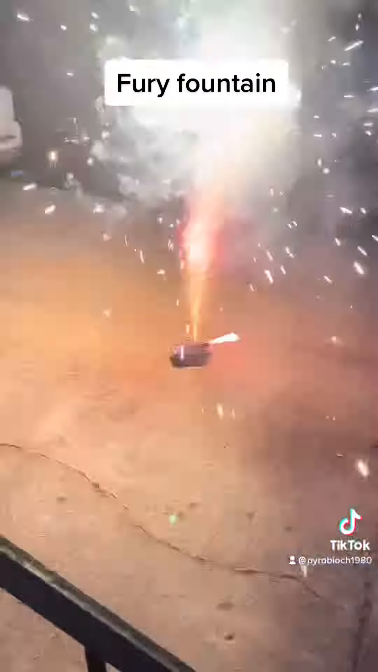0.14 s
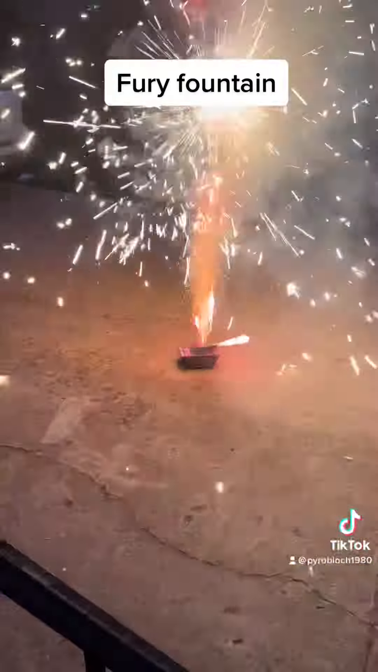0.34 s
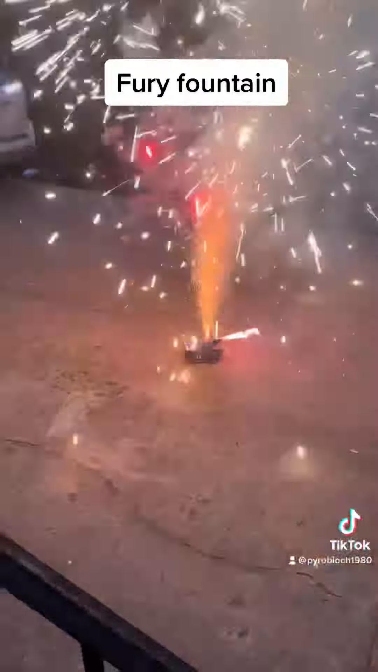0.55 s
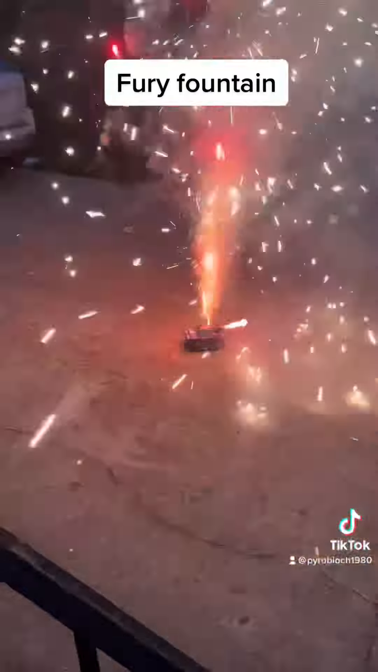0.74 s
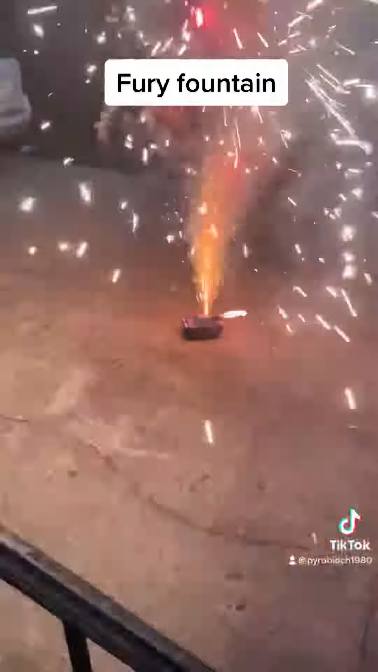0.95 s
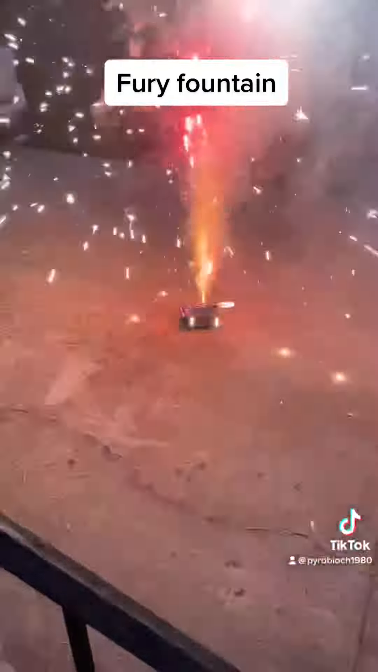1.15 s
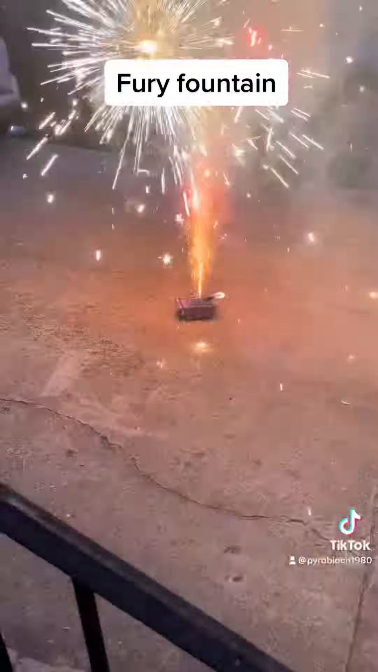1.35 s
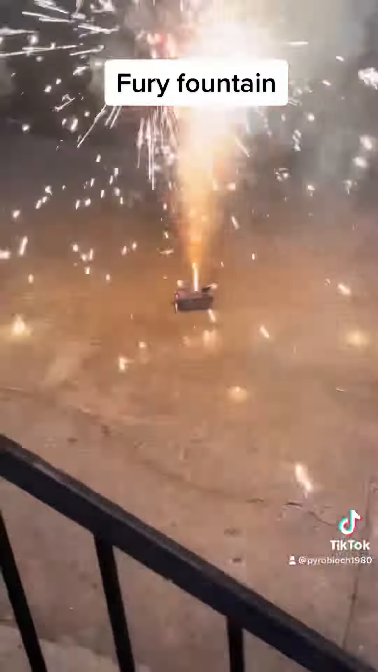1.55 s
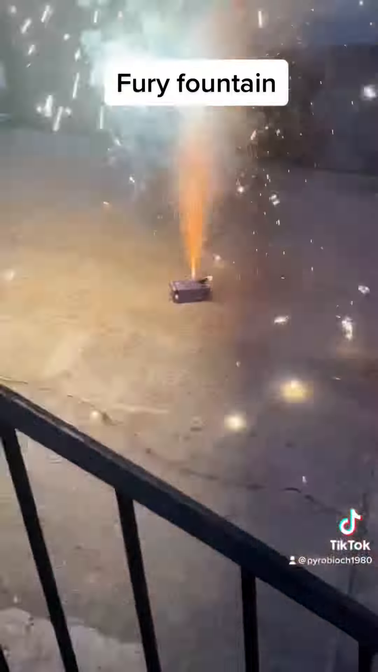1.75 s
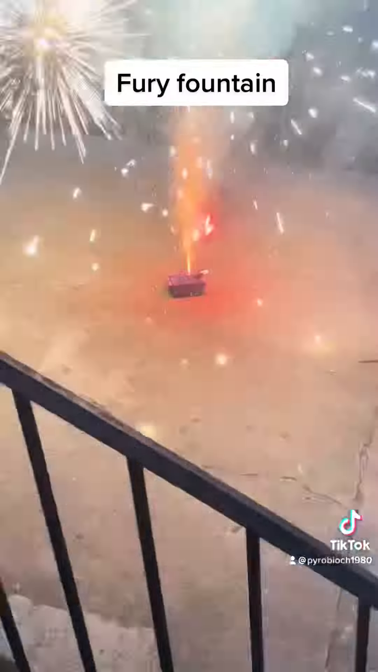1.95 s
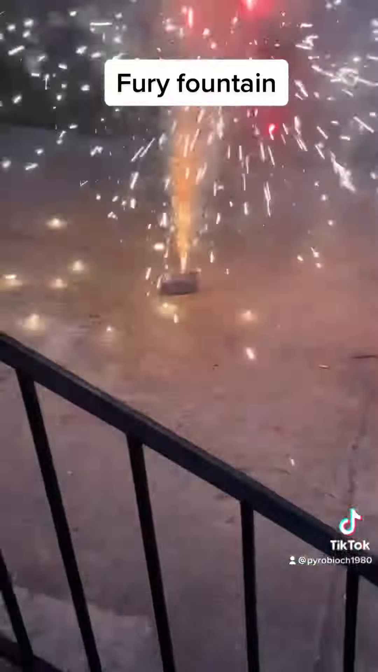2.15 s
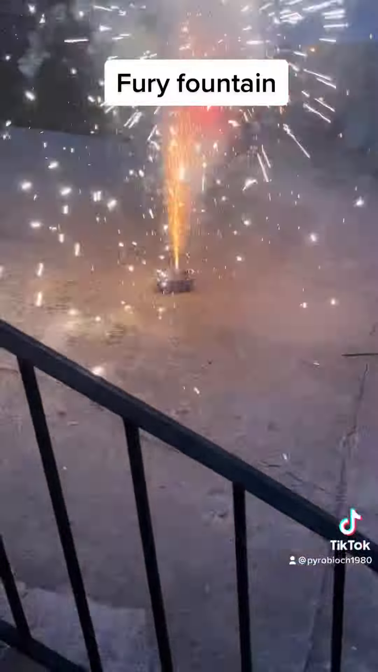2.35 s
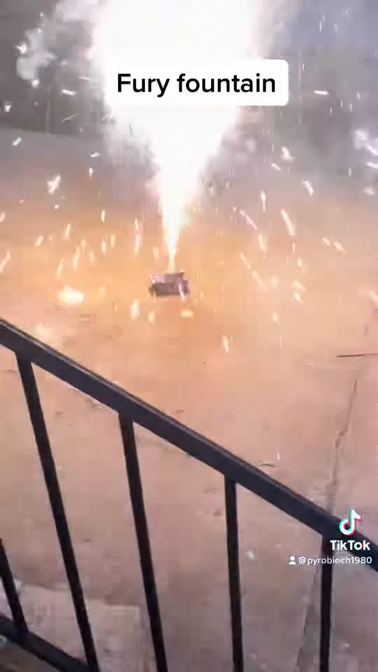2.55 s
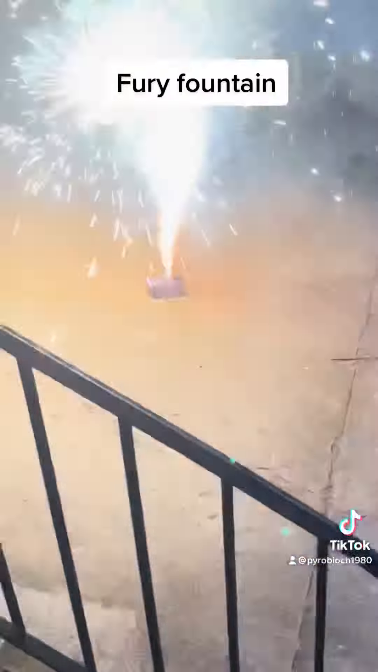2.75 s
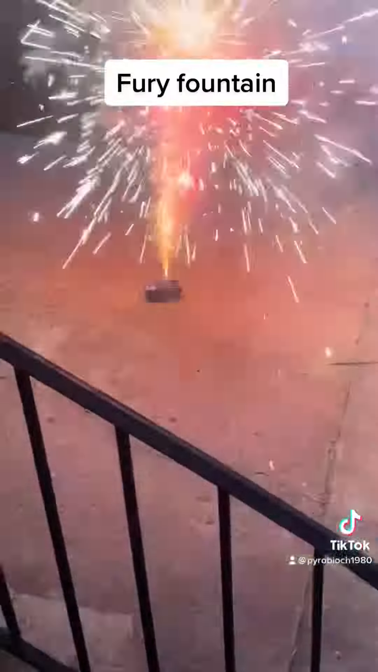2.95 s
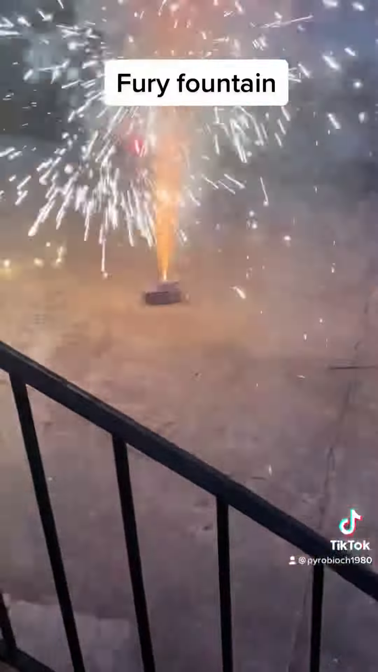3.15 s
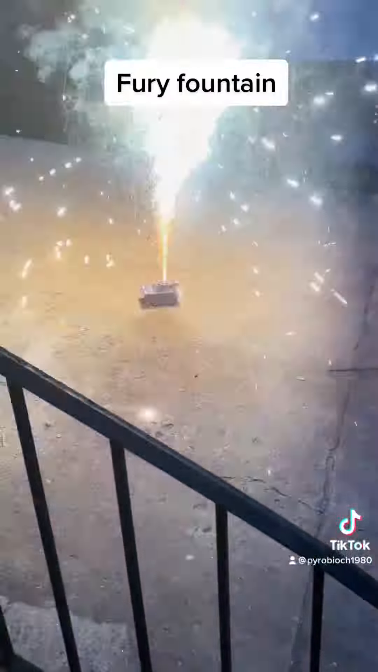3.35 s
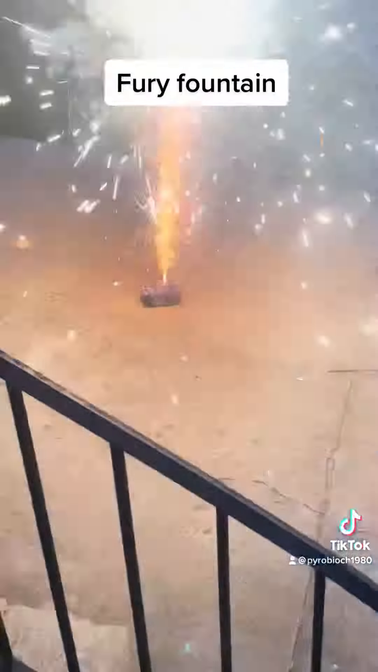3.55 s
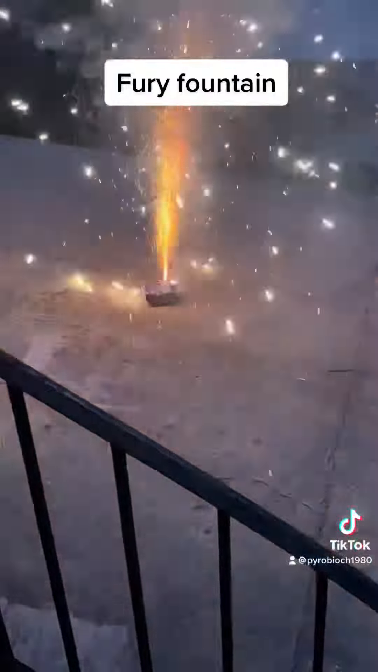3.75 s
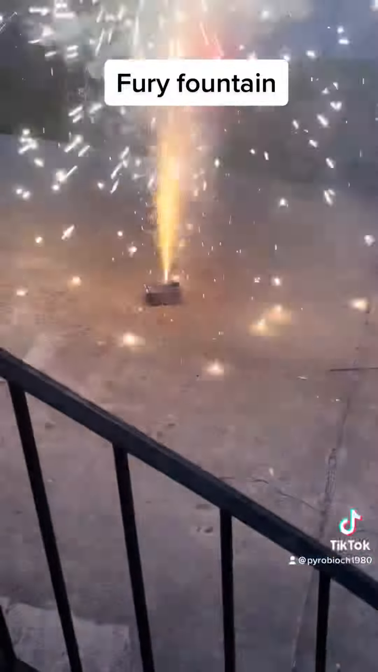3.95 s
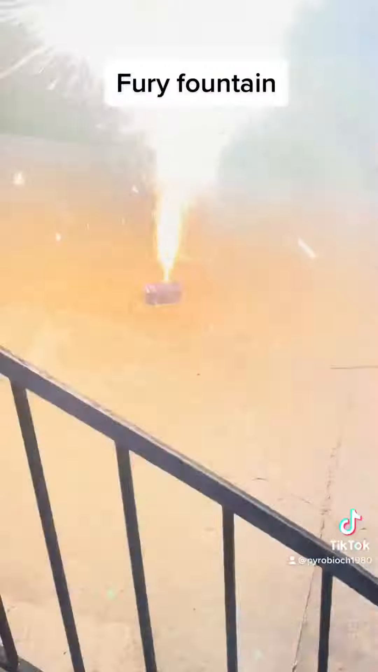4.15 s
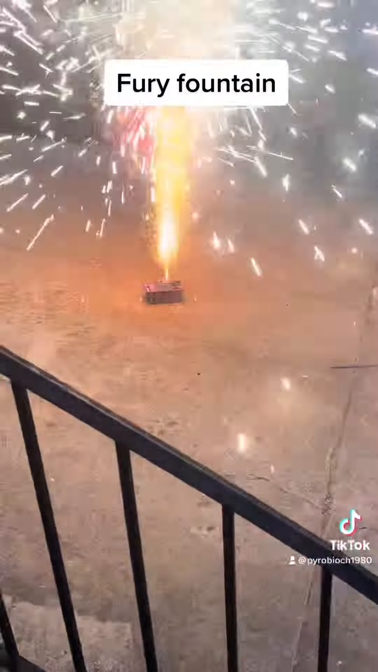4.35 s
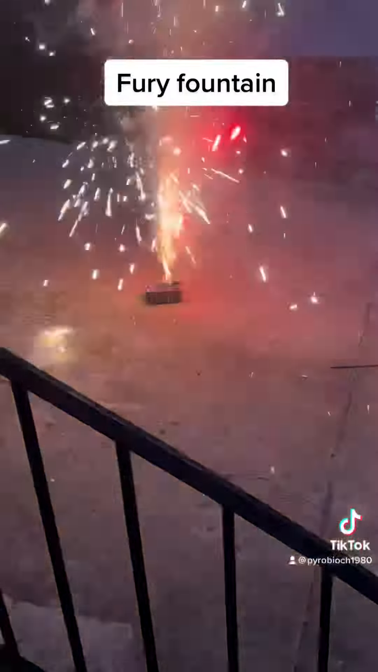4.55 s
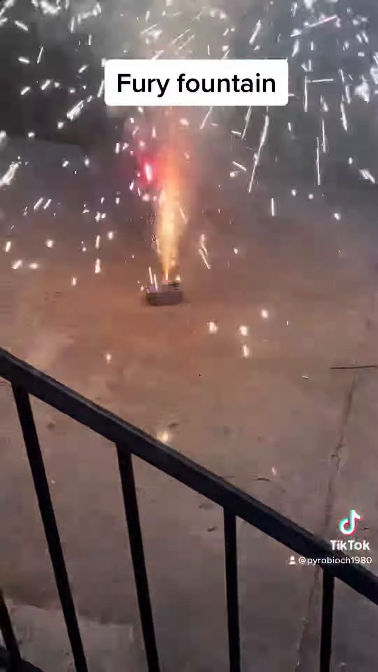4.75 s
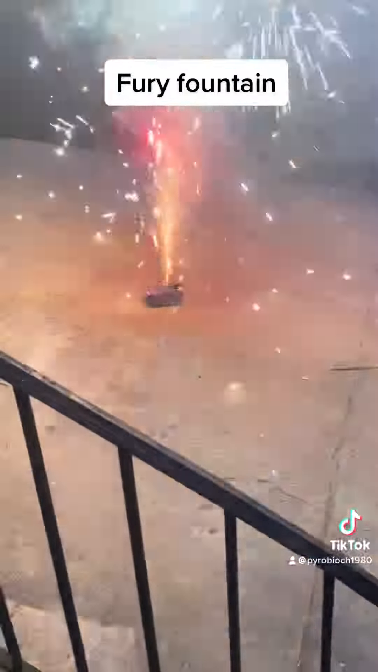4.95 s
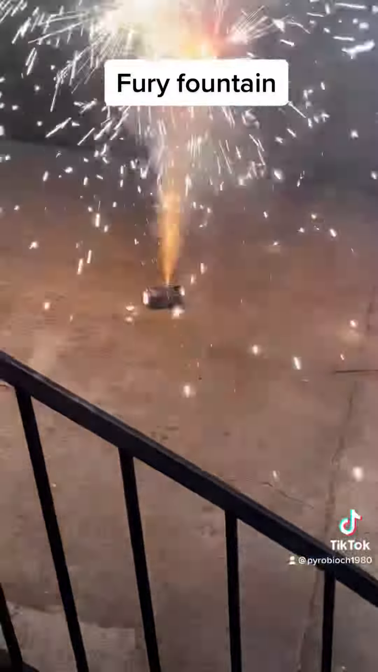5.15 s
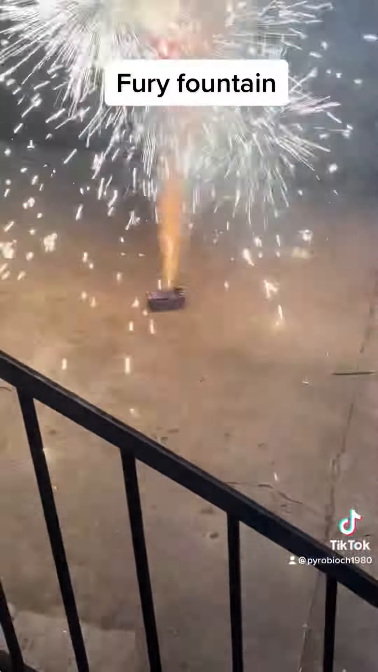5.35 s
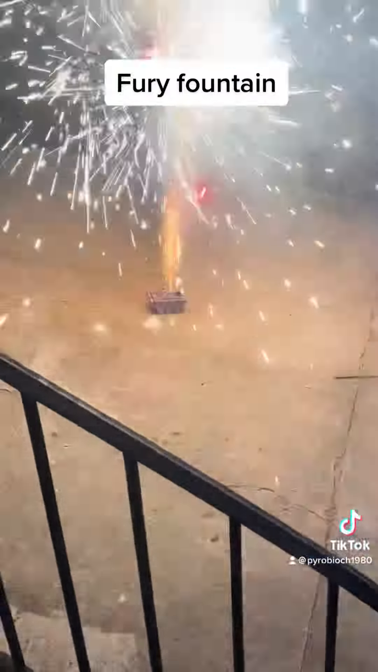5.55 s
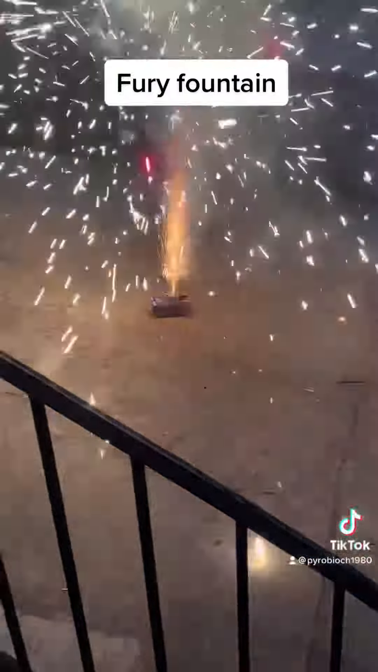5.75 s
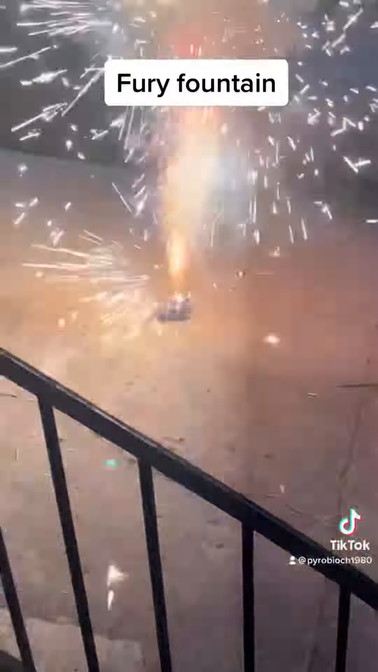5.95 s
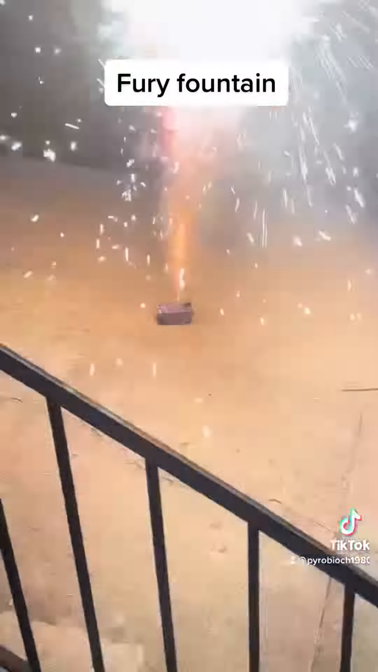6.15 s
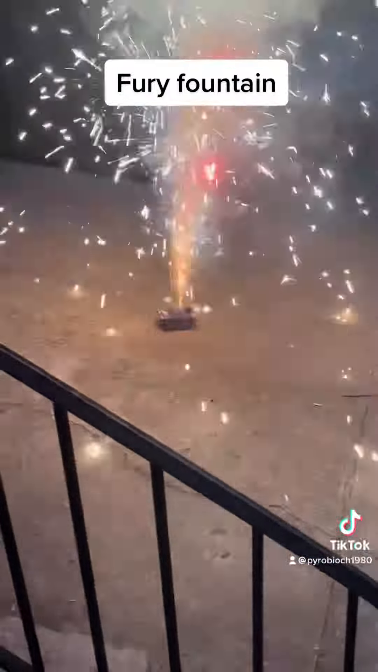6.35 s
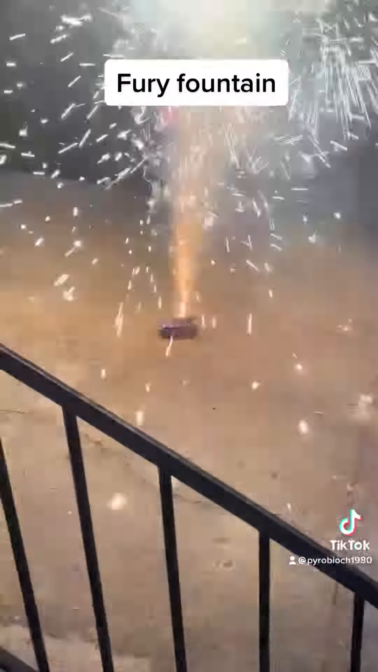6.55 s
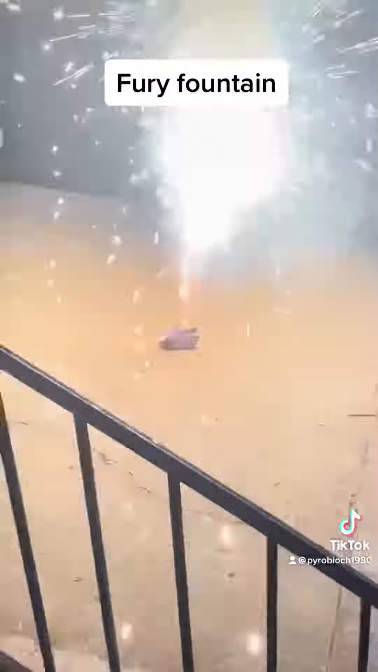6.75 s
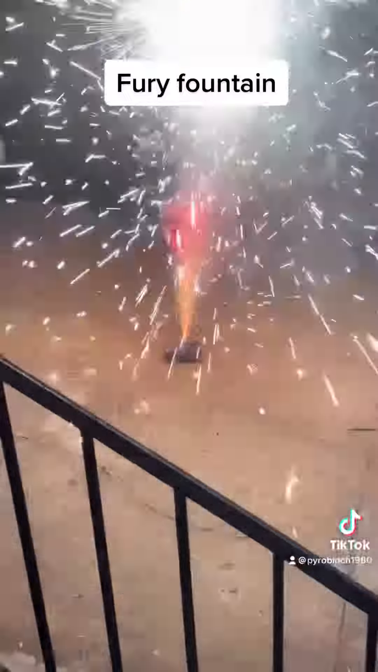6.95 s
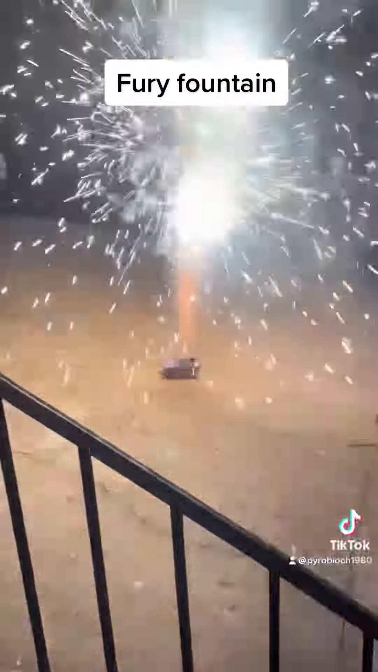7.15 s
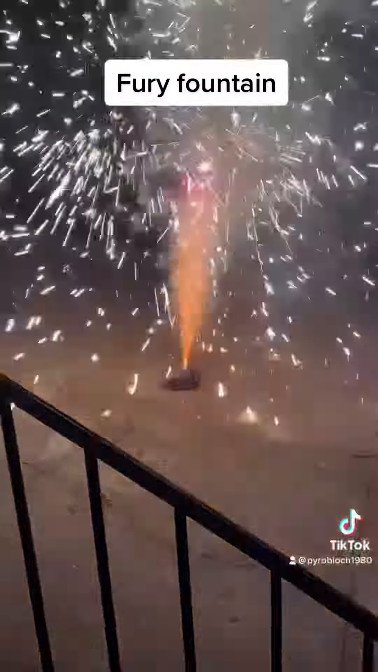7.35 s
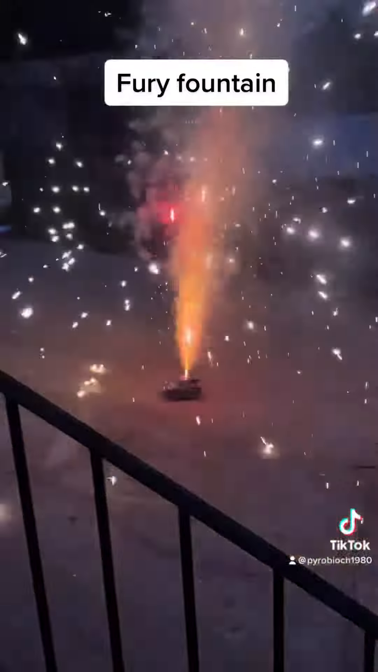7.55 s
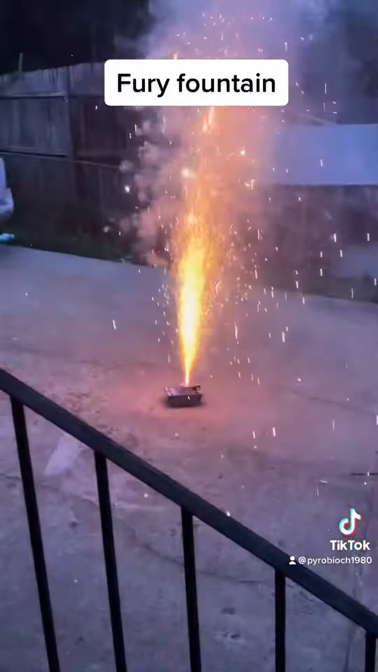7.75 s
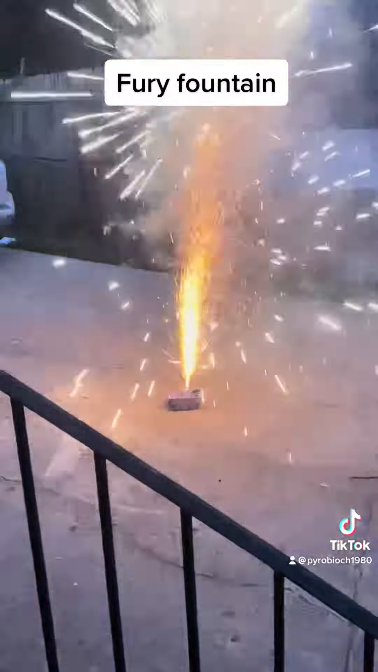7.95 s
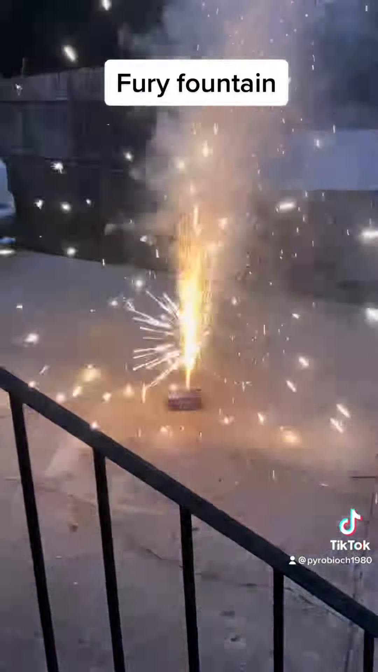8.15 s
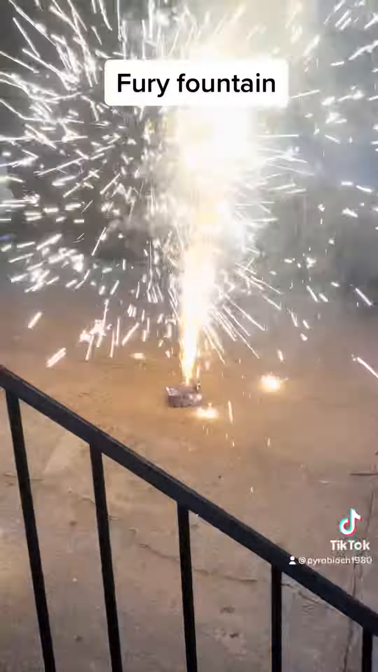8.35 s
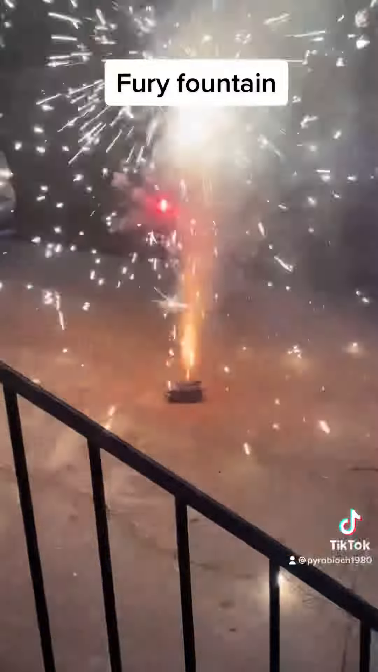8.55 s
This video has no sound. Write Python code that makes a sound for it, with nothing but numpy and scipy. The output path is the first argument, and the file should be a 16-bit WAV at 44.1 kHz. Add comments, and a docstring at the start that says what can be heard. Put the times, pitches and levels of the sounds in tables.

```python
"""Sharp crackling pops over a faint hiss: a ground fountain firework a few metres away in a paved yard at dusk.
Stars burst in short flurries, each a spike with a ragged wake, heard again off the pavement and a near wall.
Big stars also thump, as shaped clicks with a noise rumble behind; the yard's scatter is dying noise.
A handheld pair of microphone ports hears it all as sum and difference; after thumps the lower range dips."""
import sys
import numpy as np
from scipy import signal
from scipy.fft import rfft, irfft, next_fast_len
from scipy.io import wavfile

SR = 44100
rng = np.random.default_rng(int(sys.argv[2]) if len(sys.argv) > 2 else 0)


def volts_from_db(level):
    """Convert decibel levels to linear amplitude ratios."""
    exponent = np.asarray(level, float) / 20
    return 10 ** exponent


def to_wav(sig):
    """Store sig (one row per channel, or 1-D mono) as 16-bit WAV at the path in sys.argv[1].

    Samples outside -1..1 are clipped; the rate is SR.
    """
    pcm = np.clip(np.atleast_2d(sig), -1, 1) * 32767
    pcm = np.round(pcm).astype(np.int16)
    wavfile.write(sys.argv[1], SR, pcm.T)  # frames by channels


N = 379701   # length in samples


def at_hz(points, hz):
    """Reads a table on a log-frequency axis."""
    table_hz, value = np.transpose(points)
    return np.interp(np.log(np.maximum(hz, 1)), np.log(table_hz), value)


def coloured(x, spectrum, level_db=0., late_cycles=0., turn_cycles=0.):
    """Shapes the spectrum; lows may trail by a like number of cycles each, and all phases may turn together."""
    straight_hz = 750   # well above this everything arrives together
    size = next_fast_len(N + SR // 4)
    hz = np.maximum(np.arange(size // 2 + 1) * SR / size, 20)
    trail = late_cycles * np.log(hz / np.hypot(hz, straight_hz))
    phase = 2 * np.pi * (turn_cycles - trail)
    gain = volts_from_db(at_hz(spectrum, hz) + level_db)
    return irfft(rfft(x, size) * gain * np.exp(1j * phase), size)[..., :N]


def below(x, edge_hz, order):
    """The part of the sound under an edge, without delay."""
    size = next_fast_len(N)
    hz = np.arange(size // 2 + 1) * SR / size
    return irfft(rfft(x, size) / (1 + (hz / edge_hz) ** order), size)[..., :N]


# Colour of the flame hiss. Each row: frequency in Hz, relative level in dB.
JET_COLOUR = [(100, 0), (4000, 0), (6500, 4), (10500, 0), (12500, 12), (15000, 9)]


def jet():
    """The flame jet hisses smoothly, far below the pops: steady shaped noise."""
    return coloured(rng.standard_normal((2, N)), JET_COLOUR, level_db=-68.5)


# Flurries of bursting stars. Each row: first star in seconds, length in seconds, relative level of a star in dB.
FLURRIES = [(0.0035, 0.02, -11), (0.0333, 0.022, -10.5), (0.0902, 0.00042, -11.5), (0.104, 0.0051, -8.5),
            (0.154, 0.026, -11.0), (0.219, 0.0, -12), (0.237, 0.042, -11.5), (0.283, 0.046, -11.5),
            (0.35, 0.0, -9), (0.3795, 0.007, -7.5), (0.404, 0.004, -6.5), (0.434, 0.0, -8.5),
            (0.474, 0.021, -13), (0.5246, 0.026, -14.5), (0.5627, 0.013, -13.0), (0.5844, 0.013, -11.5),
            (0.641, 0.0, -15), (0.665, 0.014, -6), (0.6877, 0.016, -7.5), (0.7348, 0.0, -14),
            (0.7636, 0.011, -13.0), (0.7998, 0.00077, -10), (0.8116, 0.0035, -11), (0.8243, 0.0, -16.5),
            (0.8526, 0.057, -11.0), (0.9299, 0.0, -10.5), (0.9566, 0.009, -9), (0.989, 0.0, -8.5),
            (1.0102, 0.006, -9.5), (1.0478, 0.027, -12.5), (1.083, 0.0, -8), (1.11, 0.0, -9.5),
            (1.1519, 0.0, -23), (1.1677, 0.0, -16.5), (1.1992, 0.0028, -10.5), (1.214, 0, -15.5),
            (1.2599, 0.0, -13), (1.306, 0.006, -13.5), (1.322, 0.0, -15), (1.3454, 0.019, -10),
            (1.383, 0.01, -5.5), (1.4184, 0.014, -9), (1.4687, 0.016, -9.5), (1.4931, 0.0, -9),
            (1.542, 0.006, -5.5), (1.5646, 0.0, -10.5), (1.5854, 0.0, -12.5), (1.6146, 0.005, -9.0),
            (1.6416, 0.008, -9.5), (1.6615, 0.006, -9), (1.7178, 0.0022, -13), (1.758, 0.007, -9.5),
            (1.7815, 0.035, -12.0), (1.867, 0.0, -12.5), (1.9062, 0.0, -13), (1.9484, 0.011, -10.5),
            (1.987, 0.0, -16.0), (2.0095, 0.023, -15), (2.053, 0.006, -6.5), (2.0772, 0.014, -12.5),
            (2.105, 0.006, -7.5), (2.1263, 0.0, -13.5), (2.1737, 0.0, -13), (2.2406, 0.0, -12.5),
            (2.268, 0.014, -13), (2.2942, 0.0, -14), (2.3329, 0.0, -13.5), (2.403, 0.0, -11),
            (2.427, 0.0017, -13), (2.454, 0.0014, -19), (2.47, 0.016, -11.5), (2.5008, 0.0, -10.5),
            (2.5437, 0.005, -8), (2.583, 0.025, -12), (2.6195, 0.0, -13.0), (2.664, 0.009, -11.5),
            (2.6964, 0.0, -8.5), (2.717, 0.033, -12.5), (2.7625, 0.01, -7), (2.845, 0.01, -11),
            (2.8835, 0.017, -10), (2.9205, 0.027, -10.5), (2.9768, 0.023, -10.5), (3.0404, 0.019, -10.0),
            (3.1077, 0.0, -10.5), (3.1289, 0.016, -14.5), (3.1638, 0.0029, -17), (3.1792, 0.0, -7.5),
            (3.277, 0.00055, -9), (3.296, 0.0, -13), (3.3617, 0, -11.5), (3.376, 0.01, -8.5),
            (3.4337, 0.0, -7), (3.4788, 0.0, -17), (3.509, 0.0, -10.5), (3.5355, 0.0, -13.5),
            (3.5587, 0.017, -10.5), (3.612, 0.004, -7), (3.665, 0.0, -6.5), (3.7024, 0.0, -13),
            (3.7675, 0.0, -10), (3.7834, 0.0, -10.5), (3.814, 0.021, -10.0), (3.869, 0.004, -18),
            (3.8903, 0.004, -8.5), (3.9107, 0.0, -11), (3.9336, 0.0, -9.5), (4.0379, 0.0, -12.5),
            (4.1488, 0.01, -10.5), (4.186, 0.017, -6), (4.224, 0.0, -11), (4.275, 0.0091, -16),
            (4.29, 0.028, -12.5), (4.3321, 0.013, -9), (4.3673, 0.0, -13.5), (4.3934, 0.012, -11.5),
            (4.417, 0.008, -12.0), (4.4534, 0.0, -15), (4.4739, 0.0, -9.5), (4.4932, 0.016, -11),
            (4.5533, 0.0, -15.5), (4.576, 0.054, -11.5), (4.6432, 0.031, -11.0), (4.6843, 0.029, -8.5),
            (4.7555, 0.019, -9.5), (4.7906, 0.022, -11.5), (4.853, 0.021, -11.5), (4.878, 0.012, -12),
            (4.9196, 0.006, -17.5), (4.939, 0.026, -12), (4.978, 0.027, -10.5), (5.0213, 0.042, -10.5),
            (5.0706, 0.029, -10), (5.1107, 0.0, -4.5), (5.1335, 0.013, -9.5), (5.169, 0.015, -15),
            (5.1937, 0.071, -13.0), (5.274, 0.009, -12), (5.295, 0.049, -12), (5.349, 0.019, -11),
            (5.3813, 0.01, -8.5), (5.4135, 0.014, -9.5), (5.4347, 0.038, -11.5), (5.493, 0.0, -8.5),
            (5.51, 0.036, -10), (5.5533, 0.092, -11), (5.6644, 0.055, -9.5), (5.7491, 0.037, -9.0),
            (5.8048, 0.0, -14), (5.8257, 0.008, -15.0), (5.8435, 0.022, -11.5), (5.8858, 0.0028, -14),
            (5.8992, 0.017, -10), (5.9275, 0.003, -9), (5.9464, 0.028, -14.5), (5.9836, 0.036, -11.5),
            (6.0634, 0.015, -14.0), (6.098, 0.015, -17.5), (6.1257, 0.038, -9), (6.183, 0.0, -6.5),
            (6.2085, 0.029, -9.5), (6.255, 0.039, -10.5), (6.3141, 0.008, -10.0), (6.3366, 0.018, -12.5),
            (6.363, 0.068, -14.5), (6.4423, 0.021, -11), (6.4734, 0.005, -9), (6.5057, 0.019, -11.5),
            (6.541, 0.011, -15), (6.568, 0.024, -12.5), (6.6016, 0.052, -12), (6.6676, 0.024, -13.5),
            (6.722, 0.01, -12), (6.7404, 0.048, -10.0), (6.8178, 0.032, -13), (6.8584, 0.108, -11.5),
            (6.979, 0.022, -10.0), (7.0057, 0.018, -10), (7.038, 0.038, -10), (7.081, 0.02, -13),
            (7.1236, 0.0, -9), (7.1446, 0.007, -6.5), (7.172, 0.061, -15.5), (7.2479, 0.0, -5),
            (7.2654, 0.019, -11.0), (7.2938, 0.034, -10.5), (7.3568, 0.045, -14), (7.4146, 0.0, -16),
            (7.4434, 0.0, -14.5), (7.4593, 0.0, -13), (7.881, 0.0, -17), (7.921, 0.0, -15.5),
            (7.9588, 0.0, -11.0), (8.0318, 0.0, -7.5), (8.0717, 0.006, -7), (8.147, 0.0, -22),
            (8.1708, 0.0, -9.5), (8.1912, 0.00032, -7.5), (8.2046, 0, -12.5), (8.2408, 0.0, -8),
            (8.2845, 0.021, -10), (8.3153, 0.021, -6), (8.369, 0.021, -13.5), (8.3989, 0.027, -10),
            (8.4387, 0.007, -7), (8.46, 0.0, -6), (8.481, 0.018, -10.0), (8.5213, 0.0, -9),
            (8.5436, 0.0, -7.5), (8.566, 0.009, -5.5), (8.585, 0.01, -10)]


def stars():
    """A flurry opens with one star; more follow at uneven gaps and strengths, swelling and fading until it ends."""
    mean_gap_s, gap_scatter, spread_db = .008, .7, 3.5   # gaps vary by a share of the mean; strength either way
    swell_db, swell_full_s = 0.5, 0.029   # middle stronger than the ends, fully so from this length
    start, length, level_db = np.transpose(FLURRIES)[:, :, None]
    chance = rng.random((len(start), 2, 24))   # up to 24 stars in a flurry
    gaps = mean_gap_s * (1 + gap_scatter * (2 * chance[:, 0] - 1))
    after = np.cumsum(gaps, axis=1) - gaps[:, :1]
    arch = 2 * np.sin(np.pi * after / (length + 1e-9)) - 1
    swell = swell_db * np.minimum(length / swell_full_s, 1) * arch
    scatter_db = spread_db * (2 * chance[:, 1] - 1) * (after > 0)   # the opening star is not scattered
    strength_db = level_db + swell + scatter_db
    inside = after <= length
    return (start + after)[inside], strength_db[inside]


def bursts(s, level_db):
    """Two tracks (sum, difference): a spike with a ragged wake; the star's direction sets the difference."""
    ragged, die_ms = 0.5, 0.52   # wake strength against the spike, time for it to fall to 1/e
    steps = np.arange(40)
    chance = rng.standard_normal((len(s), 2, len(steps) + 1))
    wake = ragged * chance[:, :, 1:] * np.exp(-steps / (die_ms * SR / 1000))
    wake[:, 0, 0] -= 1
    wake[:, 1, 0] += chance[:, 1, 0]   # direction
    energy = np.mean(np.sum(wake ** 2, axis=2), axis=1)
    wake = wake / np.sqrt(energy)[:, None, None]   # equal energy for every shape
    out = np.zeros((2, N + SR))
    at = np.round(np.clip(s, 0, N / SR) * SR).astype(int)[:, None] + steps
    for track in range(2):
        np.add.at(out[track], at, volts_from_db(level_db)[:, None] * wake[:, track])
    return out[:, :N]


def crackle():
    """Each star comes direct, mirrored in the pavement (later the higher it bursts) and off the wall."""
    s, level_db = stars()
    height = rng.random(len(s))   # 0 low, 1 high
    direct = bursts(s, level_db)
    pavement = bursts(s + 0.0028 + .002 * height, level_db - 3.)
    wall = bursts(s + .0055, level_db - 4.5)
    return direct + pavement + wall


def scatter(x, t60_table, start_ms, grain_db=0.):
    """Dense reflections, never twice the same: octaves of noise whose power is fed by the source and dies away."""
    edges = 40 * 2. ** np.arange(10)   # Hz
    grain = volts_from_db(grain_db * rng.exponential(1, N))   # single echoes stick out
    white = rng.standard_normal((2, N)) * grain
    rise = np.exp(-1000 / (start_ms * SR))
    power = signal.lfilter([1 - rise], [1, -rise], x ** 2 + 1e-18)
    out = 0
    for low, high in zip(edges, edges[1:]):
        octave = signal.butter(2, [low, high], "band", fs=SR, output="sos")
        band = signal.sosfilt(octave, white)
        keep = volts_from_db(-120 / (at_hz(t60_table, np.sqrt(low * high)) * SR))   # power kept per sample
        out = out + band * np.sqrt(signal.lfilter([1 - keep], [1, -keep], power))
    return out


# Near and far scatter in the yard. Each row: frequency in Hz, time to die by 60 dB in seconds.
NEAR_T60 = [(200, 0.089), (600, 0.088), (4000, 0.086), (12000, 0.03)]
FAR_T60 = [(200, 0.13), (2000, 0.56), (12000, 0.3)]


def yard(pops):
    """The yard answers each pop with a short grainy scatter and a longer, smoother one that builds more slowly."""
    near = volts_from_db(-3.0) * scatter(pops, NEAR_T60, start_ms=0.42, grain_db=3.5)
    far = volts_from_db(-4.5) * scatter(pops, FAR_T60, start_ms=3.1)
    return near + far


# Low mids of crackle, scatter and hiss, thin at the start. Each row: time in seconds, level change in dB.
THIN_START = [(0, -13), (.22, -19), (.25, 2.5), (.3, -12), (.46, -8.5), (.6, -6), (1.2, -4)]


def thin_start(air):
    """The low mids follow a level curve over time while the rest of the spectrum stays put."""
    thin_db = np.interp(np.arange(N) / SR, *np.transpose(THIN_START))
    low_mids = below(air, 1110, order=10) - below(air, 255, order=6)
    return air + (volts_from_db(thin_db) - 1) * low_mids


# Colour of the port sum and of the port difference. Each row: frequency in Hz, relative level in dB.
SUM_COLOUR = [(24, -42), (40, -9.5), (216, -5), (290, -3.5), (367, -2), (550, 4), (887, 3), (1540, -3),
              (2600, 1.5), (4200, 2.5), (5100, -1.5), (7000, -5), (10500, -18.5), (13600, -7.5),
              (15900, -24), (16300, -53.5)]
DIFFERENCE_COLOUR = [(35, -54), (60, -43), (311, -69), (534, -42), (1030, 2), (1810, -4), (3110, 3.5),
                     (4750, -1), (5600, -6.5), (8750, -3.5), (13000, -8.5), (16500, -50)]
# Sum heard a quarter cycle late in the difference. Each row: frequency in Hz, level in dB against the sum.
QUARTER_LATE = [(300, -30), (1000, -11), (3000, -10), (4500, -14), (9000, -10), (12000, -5), (14500, -10)]


def ports(air):
    """Spaced ports: part of their difference is the sum turned a quarter cycle late."""
    total = coloured(air[0], SUM_COLOUR, level_db=13.5)
    lean = 0.09 * (total - below(total, 680.0, order=4))   # the left port is a little louder above the bass
    difference = coloured(air[1], DIFFERENCE_COLOUR, level_db=13.0) + lean
    difference = difference + coloured(total, QUARTER_LATE, turn_cycles=-1 / 4)
    return total, difference


# Big stars. Each row: time in seconds, relative thump level in dB, relative deep push level in dB.
THUMPS = [(.05, -30, -20.5), (.11, -31.5, -27), (0.25, -21.5, -20), (1.357, -8.5, -9.5), (2.096, -7, -16.5),
          (2.298, -28, -25), (2.592, -7, -16), (2.674, -21, -24), (4.609, -32.5, -22), (4.95, -27, -23),
          (4.983, -12, -12.5), (5.178, -21, -19), (5.215, -22, -22), (5.34, -8, -20), (5.441, -15, -19),
          (5.518, -8, -12.5), (5.605, -25, -21), (6.15, -20, -17), (6.216, -13.5, -8), (6.529, -8.5, -25),
          (6.625, -14.5, -17.5), (7.321, -9.5, -14)]
# Colour of the thump and of the deep push. Each row: frequency in Hz, relative level in dB.
THUMP_COLOUR = [(60, -15.5), (150, -8.5), (300, -2.5), (700, -3), (1500, -14.5), (3000, -19.5), (6000, -58)]
DEEP_COLOUR = [(22, -36), (45, -9), (70, 1), (130, -7.5), (300, -43.5)]
# Rumble behind both. Each row: frequency in Hz, time to die by 60 dB in seconds.
RUMBLE_T60 = [(60, 0.26), (300, 0.1), (1000, 0.11)]


def thumps():
    """A big charge gives a long low push with a rough rumble behind it."""
    s, thump_db, deep_db = np.transpose(THUMPS)
    clicks = np.zeros((2, N))   # thump, deep push
    at = np.round((s - .0012) * SR).astype(int)
    clicks[:, at] = -volts_from_db(np.array([thump_db, deep_db]))
    rumble = volts_from_db(np.array([[-9.], [-5.]])) * scatter(clicks, RUMBLE_T60, start_ms=2.7)
    thump, deep = clicks + rumble
    return coloured(thump, THUMP_COLOUR, level_db=34.0) + coloured(deep, DEEP_COLOUR, level_db=39.5)


# Thumps heard a quarter cycle late in the difference. Each row: frequency in Hz, level in dB against their sum.
THUMP_QUARTER_LATE = [(60, -20), (150, -12), (500, -10)]


def scene():
    """Crackle, yard, hiss and thumps reach the ports; sum and difference become left and right."""
    pops = crackle()
    air = thin_start(pops + yard(pops) + jet())
    total, difference = ports(air)
    low = thumps()
    total = total + low
    difference = difference + coloured(low, THUMP_QUARTER_LATE, turn_cycles=-1 / 4)
    return np.array([total + difference, total - difference])


# Dips of the lower range after thumps. Each row: start in seconds, end in seconds, depth in dB.
DIPS = [(0.263, 0.454, -12), (1.371, 1.52, -21), (2.11, 2.154, -12), (2.614, 2.644, -27),
        (5.002, 5.148, -25.5), (5.366, 5.423, -26), (5.534, 5.553, -24.5), (6.561, 6.617, -12.5),
        (6.636, 6.674, -14.5), (7.338, 7.454, -14.5)]


def dip(x):
    """The range below 8 kHz ducks at the listed times; a share of the deep bass escapes."""
    dip_db, t = np.zeros(N), np.arange(N) / SR
    for start, end, depth_db in DIPS:
        ramps = np.minimum((t - start) / 0.028, (end - t) / 0.015)   # s to fall, s to recover
        dip_db += depth_db * np.clip(ramps + .5, 0, 1)   # half depth in dB at start and end
    spared = 0.36 * below(x, 110, order=4)
    return x + (volts_from_db(dip_db) - 1) * (below(x, 8000, order=200) - spared)


def band_limit(x):
    """A steep low-pass at the top of the band."""
    return signal.sosfilt(signal.butter(12, 16680, fs=SR, output="sos"), x)


def record(dry):
    """Lows trail behind, the lower range dips after thumps, peaks are rounded."""
    nearly_flat = [(20, 0.005), (20000, 0.000046)]   # Hz, dB
    x = coloured(dry, nearly_flat, late_cycles=1.2, turn_cycles=0.15)
    x = dip(x)
    rounded = 1.246 * np.tanh(x / 1.085)
    return band_limit(rounded)


dry = scene()
out = record(dry)
to_wav(out)
```